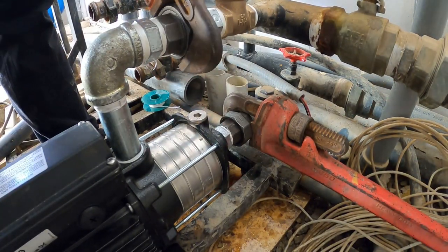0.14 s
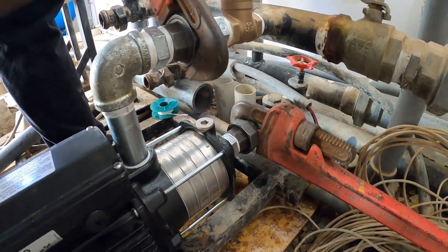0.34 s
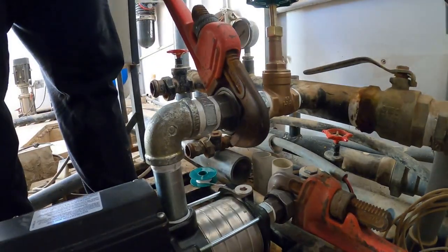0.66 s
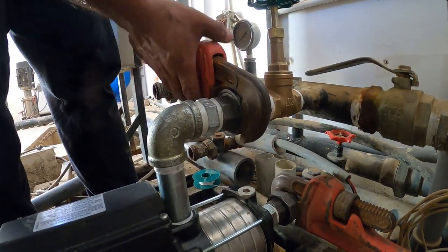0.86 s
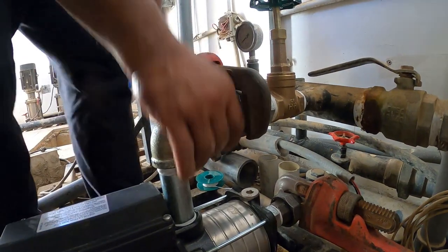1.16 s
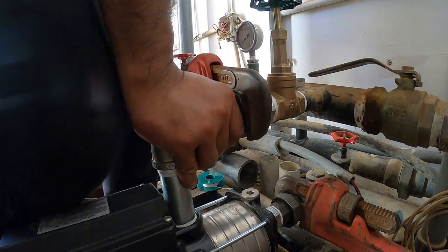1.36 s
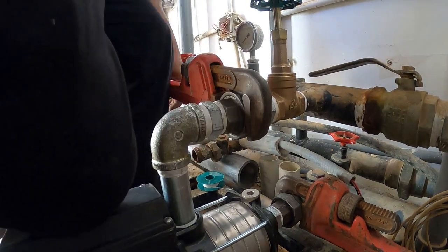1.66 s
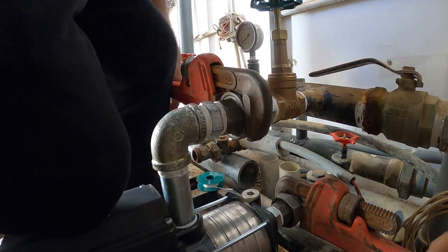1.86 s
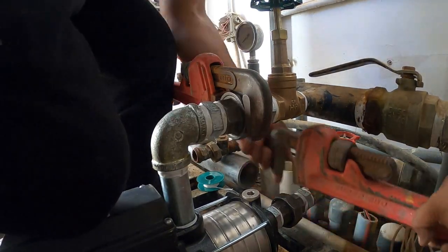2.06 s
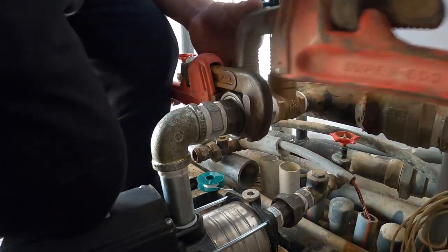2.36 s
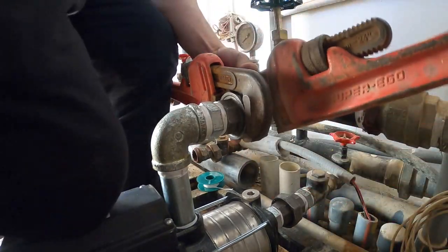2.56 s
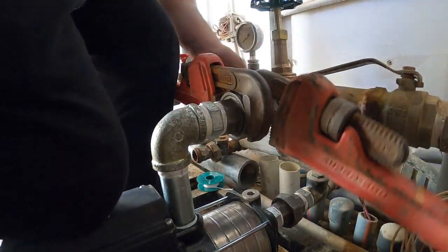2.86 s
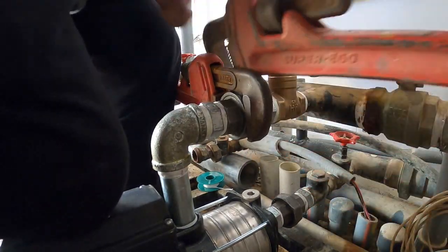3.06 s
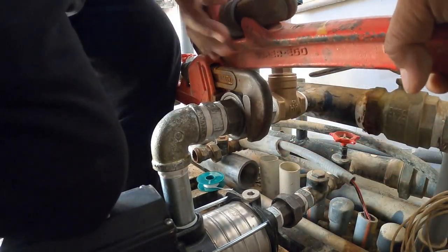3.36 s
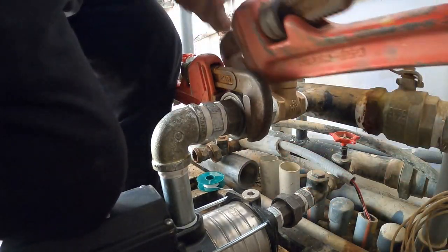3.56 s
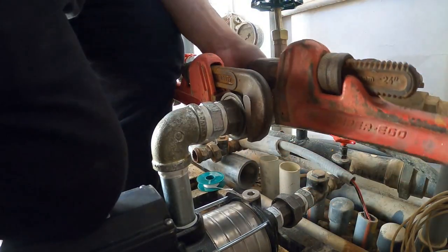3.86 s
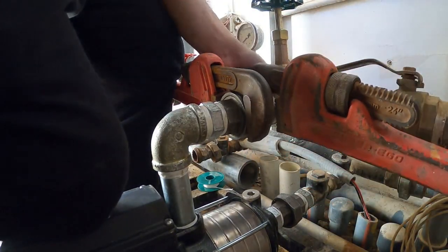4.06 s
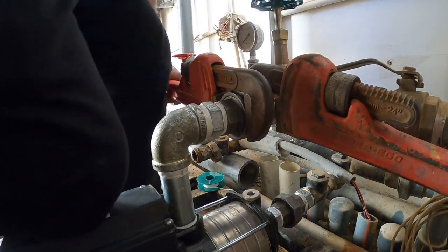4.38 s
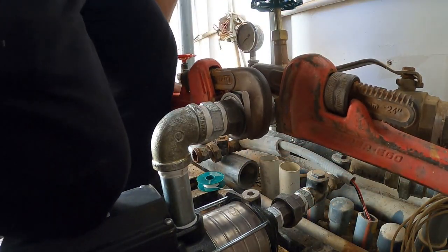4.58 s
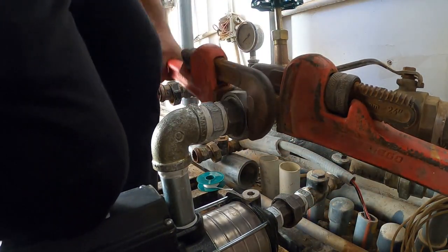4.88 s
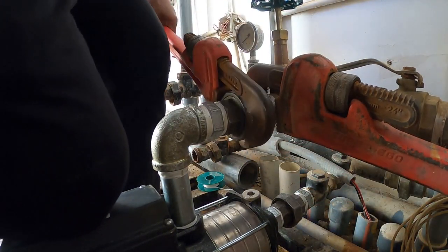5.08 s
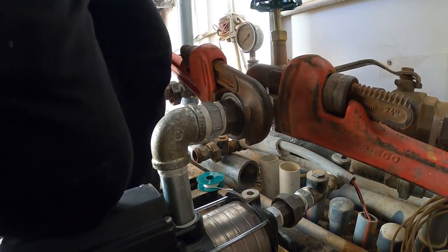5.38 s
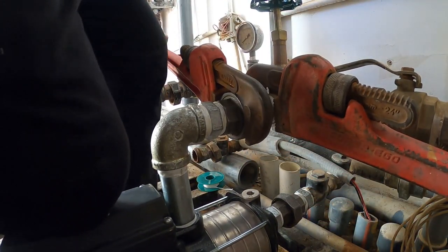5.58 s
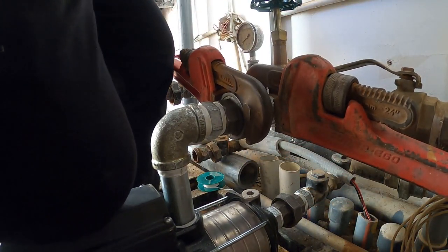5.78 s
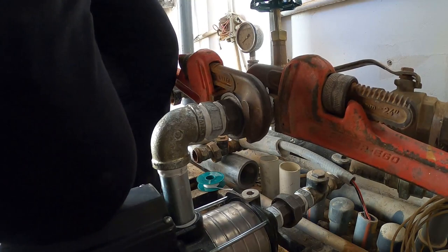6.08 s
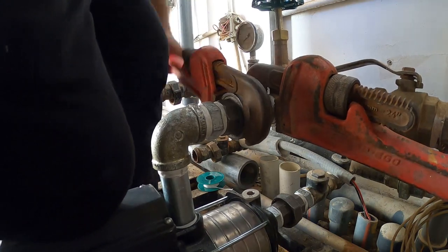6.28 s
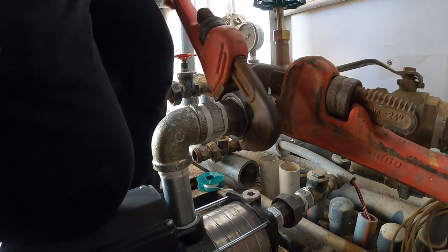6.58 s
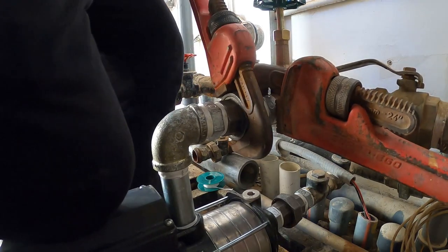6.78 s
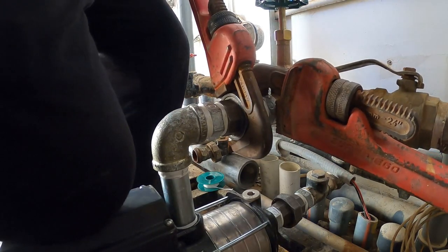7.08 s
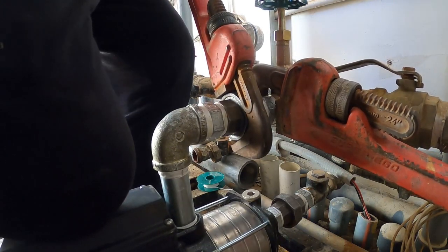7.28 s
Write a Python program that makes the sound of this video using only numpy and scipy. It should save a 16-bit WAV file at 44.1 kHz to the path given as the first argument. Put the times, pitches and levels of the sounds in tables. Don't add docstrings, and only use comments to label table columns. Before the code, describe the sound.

Heavy steel wrenches knock, scrape and clink on a threaded pipe joint, with brief squeaks and low thumps over quiet outdoor air.

```python
import sys
import numpy as np
from scipy import signal
from scipy.fft import rfft, irfft, next_fast_len
from scipy.io import wavfile
from scipy.ndimage import uniform_filter1d

SR = 44100
rng = np.random.default_rng(int(sys.argv[2]) if len(sys.argv) > 2 else 0)


def attenuation_scalar(level_db):
    decades = np.asarray(level_db, float) / 20
    return 10 ** decades


def wrap_up_sound(samples):
    columns = np.atleast_2d(samples).T
    tamed = np.clip(columns, -1, 1)
    steps = np.round(tamed * 32767).astype(np.int16)
    wavfile.write(sys.argv[1], SR, steps)


N = 328102
T = np.arange(N) / SR
SIZE = next_fast_len(N)
HZ = np.maximum(np.fft.rfftfreq(SIZE, 1 / SR), 1)
SIDES = np.array([[1], [-1]])


def window(start_s, end_s):
    return slice(max(int(start_s * SR), 0), int(end_s * SR))


def shaped(x, colour, lo_hz, hi_hz):
    hz, db = np.transpose(colour)
    tilt = attenuation_scalar(np.interp(np.log(HZ), np.log(hz), db))
    gain = tilt / np.sqrt((1 + (lo_hz / HZ) ** 6) * (1 + (HZ / hi_hz) ** 6))
    y = irfft(rfft(x, SIZE) * gain, SIZE)[..., :N]
    return y / y.std()


def pair(alike_hz, share=1.0):
    mid, side = rng.standard_normal((2, N))
    return mid + share * SIDES * signal.lfilter(*signal.butter(1, alike_hz, "high", fs=SR), side)


def flicker(rate_hz, db):
    hold = int(SR / rate_hz)
    steps = np.repeat(rng.standard_normal(N // hold + 1), hold)
    return attenuation_scalar(db * uniform_filter1d(steps, hold)[:N])


def bursts(s, size, ms, rise=0.43, fall=0.34, tail=0.61):
    out = np.zeros(N, np.asarray(size).dtype)
    for t0, a, w in zip(s, size, ms):
        near = window(t0 - .15, t0 + .3)
        u = (T[near] - t0) * 1000 / w
        decay = (1 - tail) * np.exp(-(u / fall) ** 2) + tail * np.exp(-u / 0.37)
        out[near] += a * np.where(u < 0, np.exp(-(u / rise) ** 2), decay)
    return out


def loudness(s, db, ms):
    return np.sqrt(bursts(s, attenuation_scalar(db) ** 2, ms))


def grit():
    size = attenuation_scalar(np.minimum(1.7 * rng.exponential(size=N // 16 + 1), 7.5))
    return pair(alike_hz=500, share=.55) * np.repeat(size, 16)[:N] * flicker(150, db=2)


def rung(x, modes):
    return sum(attenuation_scalar(db) * signal.lfilter(*signal.iirpeak(hz, hz / width_hz, fs=SR), x)
               for hz, width_hz, db in modes)


def ticks(s, db, ms):
    x = np.zeros(N)
    np.add.at(x, (s * SR).astype(int), attenuation_scalar(db + 14 - 1.5 * ms))
    return signal.lfilter(*signal.butter(2, [350, 3500], "band", fs=SR), x)


def chimes(s, body, high, ms, count=8, from_hz=600, span=10):
    chance = rng.random((len(s), count, 3))
    out = np.zeros((2, N))
    for t0, low_db, high_db, w, rows in zip(s, body, body + high, np.minimum(ms, 16), chance):
        near = window(t0 - .05, t0 + .12)
        u = (T[near] - t0) * 1000 / w
        swell = np.where(u < 0, np.exp(-(u / 0.21) ** 2), np.exp(-u / .5))
        for place, share, turn in rows:
            hz = from_hz * span ** place
            size = attenuation_scalar((low_db if hz < 2800 else high_db) - 3 - 10 * share)
            phase = 2 * np.pi * (hz * T[near] + turn) + SIDES * 2 * (turn - .5)
            out[:, near] += size * swell * np.sin(phase)
    return out


# (frequency [Hz], density [dB per Hz])
YARD_COLOUR = [(120, -1.5), (221, -19), (288, -12), (345, -19), (844, -29), (1870, -35.5), (6310, -59),
               (15400, -76)]
YARD_DB = -40.5


def yard():
    air = shaped(pair(alike_hz=900, share=1.0), YARD_COLOUR, 160, 9500)
    return attenuation_scalar(YARD_DB) * flicker(5.1, db=2.5) * air


# (time [s], level [dB], edge [dB above level], thud [dB], length [ms])
BLOWS = [(0.1, -26, -18.5, -30.5, 15.2), (0.18, -33, -13.5, -22.5, 31.6), (0.235, -31.5, -13, -23, 24),
         (1.269, -22, -12.5, -37, 31.6), (1.308, -20, -12.5, -31, 8.8), (3.002, -43, -14, -28, 15),
         (3.92, -25, -57, -22.5, 3.7), (3.976, -32.5, -50, -34, 4.4), (4.144, -29, -31, -20.5, 30),
         (4.763, -37.5, -19, -33.5, 11), (4.966, -30, -13, -17.5, 23), (5.054, -17.5, -19.5, -17.5, 29),
         (5.131, -26.5, -17.5, -18, 13), (6.312, -20, -28, -38, 5.9), (6.406, -28, -33.5, -22, 5.1),
         (6.436, -24.5, -16.5, -25, 19.8), (6.464, -24, -20, -18, 20), (6.59, -22.5, -67, -19.5, 20.6),
         (6.702, -25, -60, -17.5, 21), (6.753, -21, -37, -13, 13.3), (7.288, -29.5, -16.5, -35, 33)]
# (time [s], level [dB], length [ms])
LOOSE_THUDS = [(0.533, -26, 15), (1.72, -32, 19), (2.067, -22.5, 57), (2.117, -18, 18), (2.24, -23, 15),
               (2.347, -19, 21), (2.558, -22, 42), (2.64, -25, 90), (2.756, -27.5, 13), (2.889, -13, 20.7),
               (3.03, -6.5, 3.5), (3.07, -14.5, 34.6), (3.246, -19.5, 29), (3.727, -18.5, 7.1),
               (3.764, -29, 36), (3.829, -23.5, 46)]
THUD_LAG_S, THUD_MS, THUD_STRETCH = 0.0022, 7.3, 0.98


def thuds():
    after_blows = [(s + THUD_LAG_S, db, THUD_MS + THUD_STRETCH * ms) for s, _, _, db, ms in BLOWS]
    return np.transpose(after_blows + LOOSE_THUDS)


# (time [s], level [dB])
RUMBLE_SWELL = [
    (1.3, 1.2),
    (1.9, -2.5),
    (3.4, -2),
    (4.6, 1.5),
]
RUMBLE_DB = -26.5
# (time [s], level [dB], length [ms])
THUMPS = [(0.27, -27, 15), (1.32, -22, 20), (1.936, -16, 90), (2.04, -17, 20), (2.12, -14.5, 56),
          (2.351, -14, 23), (2.561, -16.5, 33), (2.669, -17, 22), (2.896, -14.5, 39), (3.08, -15, 30),
          (3.39, -24, 16), (3.83, -18.5, 29), (4.018, -33, 400), (4.11, -18, 60), (4.19, -22.5, 33),
          (4.49, -31, 24), (4.981, -15.5, 95), (5.207, -23.5, 103), (6.06, -30.5, 20), (6.48, -14.5, 49),
          (6.61, -26.5, 260), (6.79, -14.5, 28)]
# (time [s], level [dB])
RUBBING = [
    (0.0, -87),
    (0.85, -55.5),
    (2.28, -58),
    (2.73, -55),
    (3.36, -52.5),
    (4.5, -67),
    (7.44, -72.5),
]


def handling(rough):
    noise = pair(alike_hz=40, share=.22)
    rumble = shaped(noise, [(15, -18.5), (40, 4.0), (70, 0.5), (110, -12.0)], 6.6, 135.0)
    jolt = shaped(noise, [(50, 1.0), (95, 12.5), (140, -15.5)], 66, 150)
    thud = shaped(pair(alike_hz=100, share=0.12), [(140, 0.67), (280, -1.1), (600, 0.46)], 77, 414)
    rub = shaped(rough, [(500, 2.5), (3000, -3.0), (6000, -6.5), (12000, -36.5)], 330, 15000)
    out = attenuation_scalar(RUMBLE_DB + np.interp(T, *np.transpose(RUMBLE_SWELL))) * flicker(2.3, db=1.5) * rumble
    out += loudness(*np.transpose(THUMPS)) * jolt
    out += loudness(*thuds()) * thud
    return out + attenuation_scalar(np.interp(T, *np.transpose(RUBBING))) * flicker(25, db=2.5) * rub


# (time [s], level [dB], length [ms])
TAPS = [(.008, -30, 35), (.693, -47, 15), (1.682, -36, 12), (1.885, -26.5, 7.7), (1.904, -32, 42),
        (1.972, -31, 120), (2.778, -32.5, 2.6), (2.92, -23, 13), (2.949, -24.5, 21.3), (4.558, -32.5, 9.7),
        (4.896, -46.5, 80), (5.003, -31.5, 34), (5.074, -20.5, 4.7), (5.616, -35, 12), (5.709, -32, 10.7),
        (6.331, -33, 19)]
TAP_EDGE_DB = -27
# (time [s], level [dB], edge [dB above level], length [ms])
SCRAPES = [(.27, -54.5, 13.5, 12), (1.219, -50.5, -6.5, 22), (1.466, -30, -12.5, 52),
           (1.498, -26, -8.5, 36), (1.515, -23.5, -20.5, 25), (1.537, -21.5, -20, 28),
           (1.633, -31.5, -25, 5.6), (1.72, -46, -8.5, 68), (1.855, -29, -61, 36), (2.755, -31.5, -42, 4.4),
           (2.883, -21, -24, 17.4), (3.033, -31, -31, 24), (4.029, -42, 0, 17), (4.117, -45.5, -23, 42),
           (4.134, -40, -40, 4.5), (4.395, -43.5, -20.5, 22), (4.459, -46.5, -18, 66),
           (6.771, -25, -42, 16), (7.227, -44.5, -36, 6.6)]
# (time [s], level [dB], edge [dB above level], length [ms])
BRUSHES = [(.378, -56.5, -0.5, 30), (.48, -40.5, -1.5, 24), (.526, -54.5, 13, 54), (.556, -43.5, -8, 120),
           (.622, -42, 6, 20), (.646, -42.5, -10, 27), (.721, -43, -5.5, 8.1), (.756, -43, -6, 38),
           (.829, -51.5, 13.5, 13), (.974, -38.5, -14, 7.4), (1.341, -30.5, -13, 130),
           (1.56, -26.5, -11.5, 15), (1.943, -39, -16, 36), (3.884, -40, -4.5, 9.9), (4.065, -41, -10, 11),
           (4.204, -37.5, -8.5, 25), (4.937, -32, -4, 22.5), (5.22, -52.5, 1.5, 55),
           (5.45, -43.5, -6.5, 10), (5.485, -50, -2.5, 50), (5.95, -45.5, -7, 13), (6.09, -48.5, -18, 57),
           (6.284, -44.5, -15.5, 33), (6.384, -37, -14, 9.2), (6.507, -47, -9.5, 11),
           (7.34, -40.5, -13, 110)]
# (time [s], level [dB], edge [dB above level], length [ms])
RASPS = [
    (1.393, -36.5, -4, 33),
    (2.337, -40, -6, 30),
    (2.865, -35.5, -24.5, 17),
    (6.793, -45, 1.5, 11),
]
GRIT = {"blow": (0.5, 0.93), "scrape": (0.83, 0.18), "rasp": (14.7, 0.33), "brush": (-11, 0.28),
        "tap": (-4.5, 0.92)}


def contacts():
    taps = [(s, db, TAP_EDGE_DB, ms) for s, db, ms in TAPS]
    blows = [(s, db, edge, ms) for s, db, edge, _, ms in BLOWS]
    kinds = {"blow": blows, "scrape": SCRAPES, "rasp": RASPS, "brush": BRUSHES, "tap": taps}
    rows = []
    for kind, events in kinds.items():
        base_db, slope = GRIT[kind]
        rows += [(s, db, base_db + slope * edge, edge, ms) for s, db, edge, ms in events]
    return np.transpose(rows)


# (frequency [Hz], density [dB per Hz])
CONTACT_COLOUR = [(275, 5.5), (667, -17.5), (915, -10), (1370, -12.5), (4450, -24.5), (9920, -40),
                  (15400, -57)]
# (frequency [Hz], width [Hz], level [dB])
UNION_MODES = [(468, 36, 13), (960, 77, -8), (1644, 65, -1.5), (2530, 96, -12), (4770, 110, -15)]
# (frequency [Hz], width [Hz], level [dB])
PIPE_MODES = [(955, 29, 3), (1000, 48, 16.5), (2370, 24, 3), (3160, 98, -1), (1520, 37, -7),
              (1730, 60, -24), (2000, 19, -6), (2850, 35, 2.5), (3400, 200, -12.5), (3800, 150, -6.5) ]
HELD_S = 5.3, 6.2


def knocks(rough):
    s, body, high, fizz, ms = contacts()
    mid = loudness(s, body, ms) * shaped(rough, CONTACT_COLOUR, 600, 2800)
    top = loudness(s, body + high, ms) * shaped(rough, CONTACT_COLOUR, 2800, 6000)
    air = loudness(s, body + fizz, ms) * shaped(rough, CONTACT_COLOUR, 6000, 16000)
    blow = shaped(rough, [(100, 0), (9000, 0)], 300, 6000) * loudness(s, body, ms)
    on_union = (T > .05) * (T < .3)
    on_pipe = (T > 2.7) * ((T < HELD_S[0]) | (T > HELD_S[1]))
    ring = attenuation_scalar(16.5) * rung(blow * on_union, UNION_MODES)
    ring += attenuation_scalar(-2.5) * rung(blow * on_pipe, PIPE_MODES)
    noise = attenuation_scalar(-0.5) * mid + attenuation_scalar(2.5) * top + air
    return noise + ring + ticks(s, body, ms) + chimes(s, body, high, ms)


# (time [s], level [dB], pitch [Hz], width [Hz], length [ms])
PATCHES = [(0.089, -32, 1280, 200, 11), (0.098, -41, 4770, 150, 22), (.175, -25, 457, 80, 15),
           (0.234, -23.5, 440, 80, 17), (1.258, -33.5, 1510, 300, 14), (1.263, -29, 6700, 900, 9.1),
           (1.367, -29, 5840, 900, 17), (1.39, -18, 4390, 900, 32), (1.404, -26, 3700, 800, 37),
           (1.466, -32.5, 3148, 400, 8), (1.514, -20, 2520, 900, 29), (1.554, -27, 2260, 1000, 20),
           (2.55, -20.5, 1000, 149, 28), (5.07, -31, 3200, 250, 25), (5.13, -29.5, 2530, 400, 15),
           (6.465, -33, 2630, 500, 15), (6.591, -30, 2740, 596, 15), (7.27, -40, 1040, 200, 25),
           (7.32, -35.5, 533, 150, 93), (7.335, -52, 2850, 120, 45)]


def patches(rough):
    out = np.zeros((2, N))
    for s, db, hz, width_hz, ms in PATCHES:
        near = window(s - .08, s + .12)
        tone = rung(rung(rough[:, near], [(hz, width_hz, 0)]), [(hz, 2 * width_hz, 0)])
        power = uniform_filter1d(np.mean(tone ** 2, axis=0), size=SR // 70)
        out[:, near] += loudness([s], [db], [ms])[near] * tone / np.sqrt(power + 1e-12)
    return out


# (time [s], peak [dB], pitch [Hz], t60 [ms])
PINGS = [(.103, -35.5, 1640, 33), (0.175, -27, 2700, 35), (.18, -26.5, 1740, 77), (1.32, -22, 3720, 71),
         (2.059, -19, 3200, 25), (2.163, -8.5, 3133, 97), (2.221, -17.5, 1467, 79), (2.317, -24, 1900, 20),
         (2.455, -28, 1450, 84), (2.568, -27, 4210, 80), (2.862, -22, 5265, 28), (2.883, -22, 4215, 50),
         (3.029, -17.5, 4230, 30), (3.185, -30, 6400, 78), (3.192, -11, 3138, 100),
         (3.522, -17.5, 1895, 93), (3.557, -24, 4250, 120), (3.745, -20.5, 1900, 94),
         (3.826, -12, 1890, 72), (4.917, -24, 1060, 51), (4.968, -35, 4280, 130), (5.056, -13, 910, 130),
         (6.424, -30, 4780, 110), (7.258, -26.5, 510, 40), (7.284, -38, 2600, 55), (.098, -22, 950, 38),
         (6.426, -13, 960, 64), (6.581, -14, 976, 53), (5.05, -17, 1960, 100), (5.042, -21.5, 3190, 70),
         (6.312, -28, 1900, 23), (6.747, -21, 2710, 35), (6.765, -17, 2630, 38), (6.764, -15, 984, 54)]
PING_RISE_MS, PING_SPLIT, PING_TWIN_DB = 2.2, .012, -3.5


def pings():
    out = np.zeros((2, N))
    for s, db, hz, t60_ms in PINGS:
        near = window(s, s + .15)
        u = T[near] - s
        swell = (1 - np.exp(-u * 1000 / PING_RISE_MS)) * attenuation_scalar(db - 60000 * u / t60_ms)
        turn = 2 * np.pi * hz * u + SIDES * hz / 5000
        out[:, near] += swell * (np.sin(turn) + attenuation_scalar(PING_TWIN_DB) * np.sin(turn * (1 + PING_SPLIT)))
    return out


# (time [s], pitch [Hz], level [dB], length [ms])
SQUEAKS = [
    (.235, 4640, -45, 47),
    (1.72, 3450, -38, 24),
    (1.72, 2810, -35, 17),
    (2.858, 4880, -38, 22),
    (4.871, 4450, -48, 27),
    (4.952, 4205, -32, 32),
    (5.831, 153.5, -30.5, 77),
    (7.248, 3540, -45, 30),
    (7.325, 1884, -39, 24),
    (7.355, 2020, -46, 60),
]


def squeaks():
    drift = np.cumsum(np.log(flicker(200, db=.04))) / SR
    tones = sum(bursts([s], [attenuation_scalar(db)], [ms]) * np.sin(2 * np.pi * hz * (T + drift))
                for s, hz, db, ms in SQUEAKS)
    return np.sqrt(2) * tones * flicker(150, db=7.0)


# (time [s], peak [dB], pitch [Hz])
STRIKES = [(1.3096, -2, 830), (2.166, -21, 3100), (2.882, -16, 900), (2.919, -14, 900), (3.03, -11, 2520),
           (3.192, -11, 3000), (3.236, -19, 710), (3.334, -7, 2810), (3.607, -12, 3020), (3.639, -15, 2800),
           (3.827, -5, 1400), (2.582, -13, 3000), (1.393, -15, 4500), (5.047, -13, 1180),
           (6.315, -10, 1100), (6.705, -11, 706), (6.749, -9, 1000), (6.769, -7, 1000)]


def strikes():
    out = np.zeros(N)
    for s, db, hz in STRIKES:
        near = window(s - .004, s + .004)
        u = (T[near] - s) * hz
        out[near] += attenuation_scalar(db) * np.exp(-(u / .45) ** 2) * np.cos(2 * np.pi * u)
    return out


# (frequency [Hz], level [dB above its leading level], t60 [s])
WRENCH_MODES = [(947, -22, .12), (1460, -20, .07), (1905, 1, .05), (2600, -14, .04), (3140, 4, .042),
                (3520, -12, .03), (4240, -15, .06), (4585, -15, .07), (4764, -11, .08), (5930, 1, .12),
                (6242, 1.5, .09), (9775, -8.5, .018), (12600, -26.5, .03), (14250, -39, .03)]
LOW_LEADERS, LEADERS = (2, 4), (2, 4, 8, 11)
WRENCH_PAN_DB, WRENCH_SPREAD = -1.15, 0.69


def wrench_ring(s, ms, up_s, up_ms, low, high, upper, fizz, top):
    out = np.zeros((2, N))
    chance = rng.random((len(s), len(WRENCH_MODES), 2))
    span = window(1.9, 4.2)
    waver = np.cumsum(np.log(flicker(40, db=.035))) / SR
    leads = [(2500, low), (4000, high), (5500, upper), (8000, fizz), (SR, top)]
    for k, (hz, db, t60) in enumerate(WRENCH_MODES):
        main = k in LOW_LEADERS
        lead = next(level for below_hz, level in leads if hz < below_hz)
        at, long = (s, ms) if hz < 4000 else (up_s + .003, up_ms)
        scatter_db = 0 if k in LEADERS else 9 * (chance[:, k, 0] - .5)
        phase = np.exp((.5j if main else 2j) * np.pi * chance[:, k, 1])
        size = attenuation_scalar(lead + db + scatter_db + 1.0) * phase
        bounce = np.repeat(rng.standard_normal((N // 60 + 1, 2)) @ [1, 1j], 60)[:N]
        settling = attenuation_scalar(-5.0) * bursts(at + 0.011, size, 2.95 * long) * bounce * flicker(120, db=3.0)
        roughness = 1.2 if main else 1 + hz / 2000
        push = bursts(at + .002, size, 1.1 * long, rise=.7) * (1 + roughness * bounce) + settling
        keep = np.exp(-np.log(1000) / (t60 * SR))
        swing = signal.lfilter([1 - keep], [1, -keep], push[span])
        apart = signal.lfilter([1 - keep], [1, -keep], (np.abs(push) * bounce[::-1])[span])
        swing = swing + WRENCH_SPREAD * SIDES * apart / 2
        turn = -SIDES * .3 * rng.random()
        tone = np.imag(swing * np.exp(1j * (2 * np.pi * hz * (T + waver)[span] + turn)))
        out[:, span] += attenuation_scalar(WRENCH_PAN_DB * SIDES) * tone
    return out


# (time [s], contact noise [dB], low ring [dB], high ring [dB], length
# [ms])
RATTLES = [(2.032, -26.5, -27.5, -32, 34), (2.06, -28.5, -20, -29, 4.6), (2.11, -41, -9.5, -26.5, 13),
           (2.142, -27.5, -35, -29, 45), (2.164, -33, -14, -15.5, 5), (2.232, -27.5, -14.5, -26.5, 19.3),
           (2.29, -32, -20, -21.5, 5.3), (2.357, -26, -8, -17, 9.1), (2.462, -41, -59, -32.5, 18.4),
           (2.476, -59.5, -11, -46.5, 3), (2.539, -25, -20.5, -48.5, 13), (2.56, -39, -23, -33, 15),
           (2.585, -26.5, -24.5, -24.5, 26), (2.599, -14.5, -45, -40, 3.2), (2.616, -20.5, -9.5, -6, 3),
           (2.637, -25.5, -41.5, -21, 7.9), (2.65, -22.5, -23.5, -30, 33.6),
           (3.069, -18.5, -23.5, -22, 23), (3.137, -32.5, -26.5, -23.5, 18), (3.17, -32, -23.5, -28, 12),
          (3.193, -45, -37, -24.5, 28), (3.204, -72.5, -10, -34, 18), (3.244, -51, -13, -25.5, 6.1),
          (3.29, -47, -11, -29, 3.7), (3.336, -39, -15, -19.5, 13), (3.354, -54, -18, -14, 6.6),
          (3.379, -28.5, -17.5, -15.5, 7.5), (3.443, -63.5, -17, -18, 15.7), (3.478, -59, -19, -13, 4),
          (3.529, -61, -11, -21.5, 7.1), (3.579, -72, -27.5, -26, 27), (3.605, -56, -10.5, -16, 5.4),
          (3.619, -49, -20, -5.5, 2.1), (3.641, -36, -12.5, -15, 9.3), (3.724, -70, -17.5, -37.5, 8.4),
          (3.758, -29.5, -20, -36.5, 29), (3.823, -22.5, -19.5, -22, 23)]
# (time [s], 10 kHz ring [dB], 4.7 kHz ring [dB], 6 kHz ring [dB])
SHEEN = [(2.033, -73, -47, -42.5), (2.06, -52.5, -48, -52.5), (2.096, -57, -61, -46),
         (2.143, -48, -46.5, -50.5), (2.164, -54.5, -39, -56.5), (2.227, -43, -33.5, -41.5),
         (2.286, -78, -45, -55.5), (2.326, -35, -52, -45.5), (2.339, -33.5, -33.5, -29.5),
         (2.464, -82, -56, -58.5), (2.544, -63, -35.5, -59), (2.559, -67, -41.5, -63),
         (2.582, -61, -31, -62), (2.602, -50, -42.5, -48.5), (2.616, -41.5, -33.5, -27.5),
         (2.636, -44, -29.5, -33), (2.645, -55.5, -37, -39), (3.064, -41, -34.5, -40.5),
         (3.137, -79, -65, -62), (3.164, -71.5, -44, -50), (3.193, -78.5, -39.5, -42.5),
         (3.206, -69, -52, -47.5), (3.246, -58.5, -48.5, -51), (3.291, -85, -46.5, -62),
         (3.335, -55, -29, -37.5), (3.354, -44.5, -31.5, -35), (3.377, -53, -45, -47),
         (3.439, -47.5, -28, -34.5), (3.481, -47.5, -48.5, -41.5), (3.521, -58.5, -41, -42.5),
         (3.571, -40.5, -35.5, -40), (3.608, -48.5, -37, -37), (3.622, -44.5, -40.5, -47),
         (3.643, -43.5, -34, -45), (3.723, -77, -67, -60), (3.754, -69.5, -71, -70),
         (3.827, -42.5, -47, -38)]
SHEEN_GAIN_DB = (6, 15, 0.5)
SHEEN_MS = 11
# (frequency [Hz], width [Hz], level [dB])
NUT_MODES = [(7800, 50, 4.5), (7930, 50, 8), (8160, 68, 5.5), (8540, 50, 7)]


def clinks(rough):
    s, noise, low, high, ms = np.transpose(RATTLES)
    up_s, *sheen = np.transpose(SHEEN)
    up_ms = np.full(len(SHEEN), SHEEN_MS)
    top, upper, fizz = (db + gain_db for db, gain_db in zip(sheen, SHEEN_GAIN_DB))
    fizz_swell = loudness(up_s, fizz, up_ms)
    out = attenuation_scalar(3) * loudness(s, noise, ms) * shaped(rough, CONTACT_COLOUR, 700, 5000)
    out += attenuation_scalar(-5.5) * fizz_swell * shaped(rough, CONTACT_COLOUR, 10000, 12000)
    out += attenuation_scalar(-24.0) * loudness(up_s, top, up_ms) * shaped(rough, CONTACT_COLOUR, 8500, 15000)
    out += rung(fizz_swell * rough / rough.std(), NUT_MODES)
    out += attenuation_scalar(-6) * loudness(s, high, ms) * shaped(rough, CONTACT_COLOUR, 4200, 3200)
    out += ticks(s - .004, noise + 4, ms) + chimes(s, noise, 3 + 0 * noise, ms)
    minor = chimes(s + 0.0043, low, high - low, 2.3 * ms, count=12, from_hz=1500, span=4.2)
    out += attenuation_scalar(-13.5) * minor
    return out + wrench_ring(s, ms, up_s, up_ms, low, high, upper, fizz, top)


def scene():
    rough = grit()
    steel = knocks(rough) + patches(np.roll(rough, 2 * SR, axis=1)) + pings()
    steel = steel + squeaks() + strikes() + clinks(rough[:, ::-1])
    tail = rng.standard_normal((2, SR // 5)) * attenuation_scalar(-60 * T[:SR // 5] / 0.21)
    dulled = signal.lfilter(*signal.butter(1, 3000, fs=SR), steel)
    wet = signal.fftconvolve(dulled, tail, axes=1)[:, :N]
    return steel + attenuation_scalar(-40.5) * wet + handling(np.roll(rough, SR, axis=1)) + yard()


def top_cut(x):
    return signal.sosfilt(signal.butter(12, 15590, fs=SR, output="sos"), x)


def record(dry):
    left = attenuation_scalar(-3.5) * np.pad(dry[0], (2, 0))[:N]
    right = attenuation_scalar(-5.5) * dry[1]
    return top_cut(np.array([left, right]))


dry = scene()
out = record(dry)
wrap_up_sound(out)
```